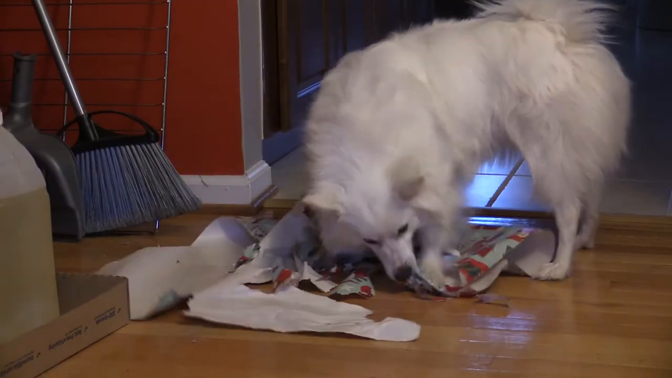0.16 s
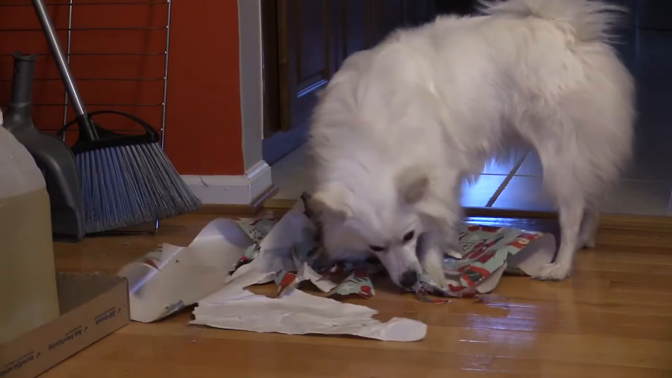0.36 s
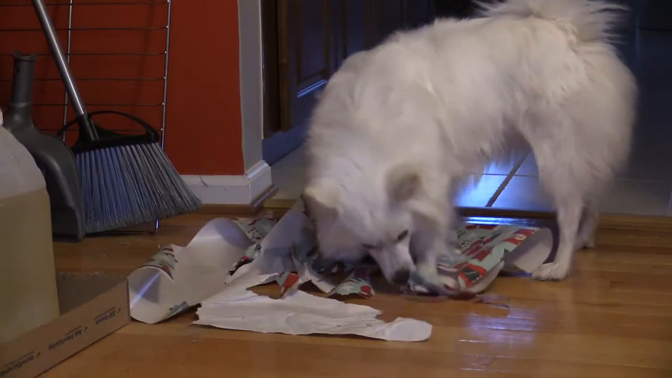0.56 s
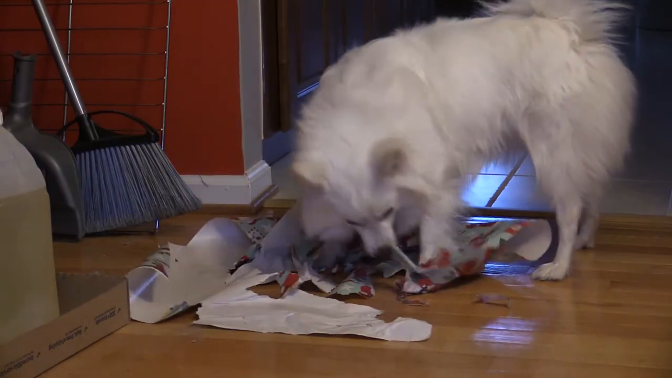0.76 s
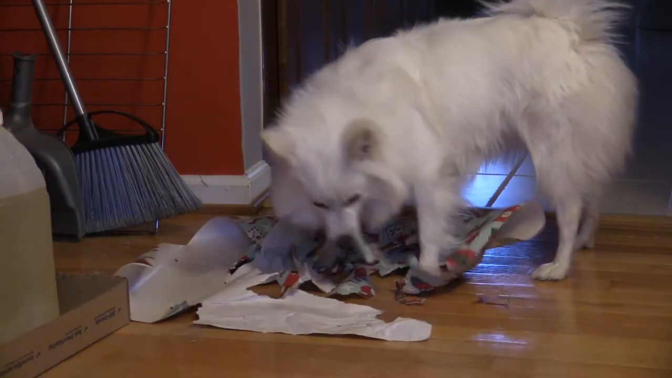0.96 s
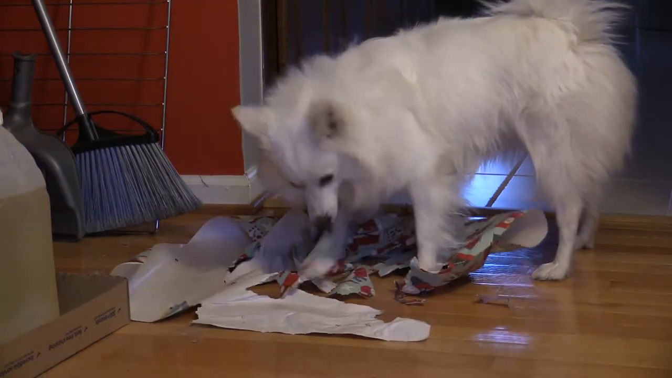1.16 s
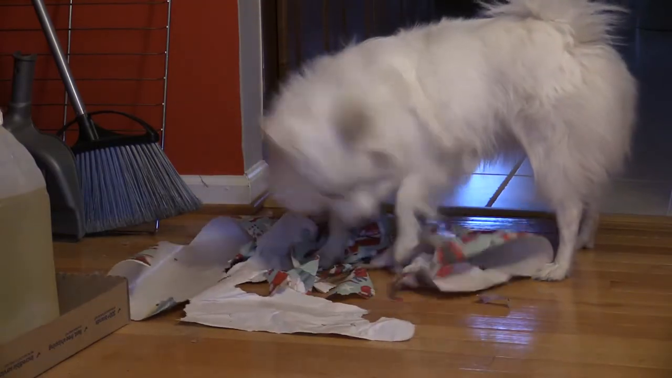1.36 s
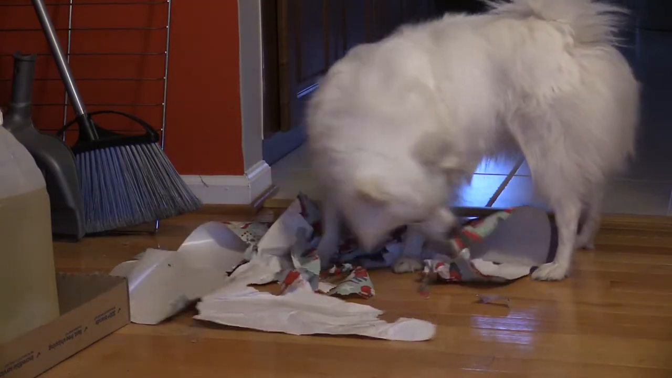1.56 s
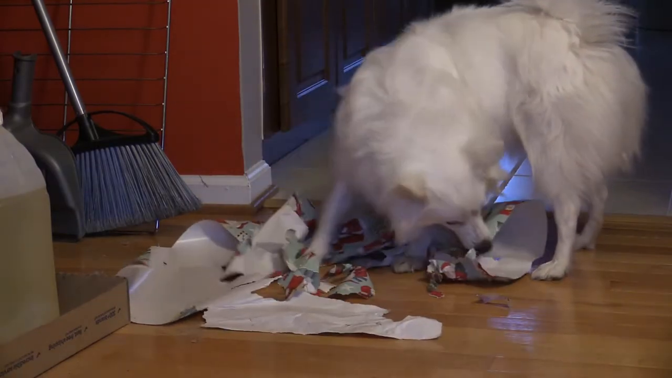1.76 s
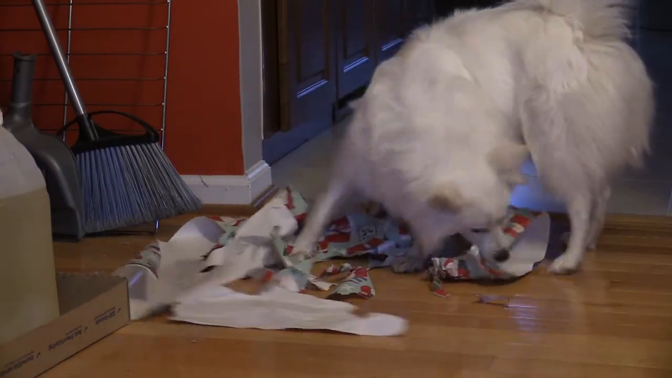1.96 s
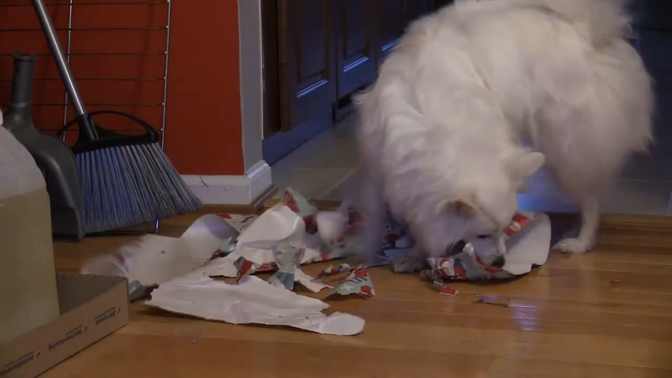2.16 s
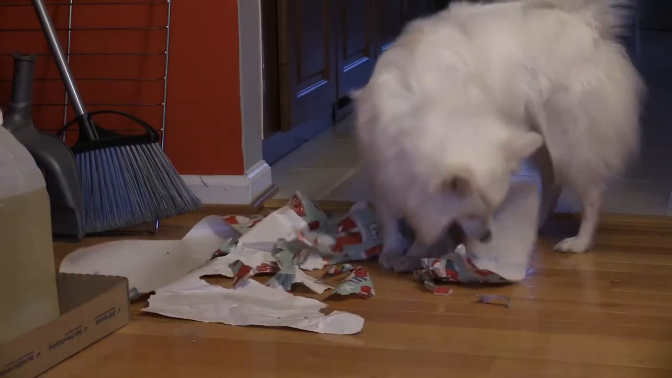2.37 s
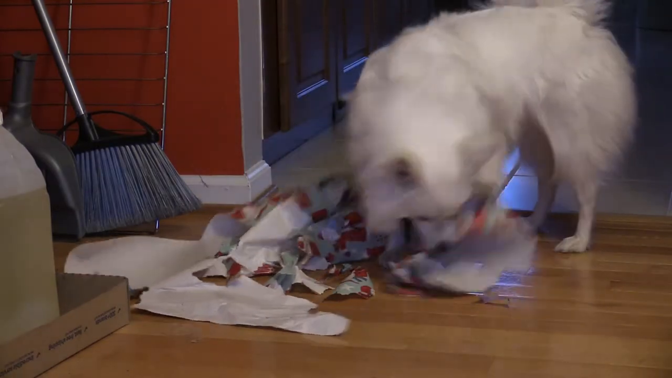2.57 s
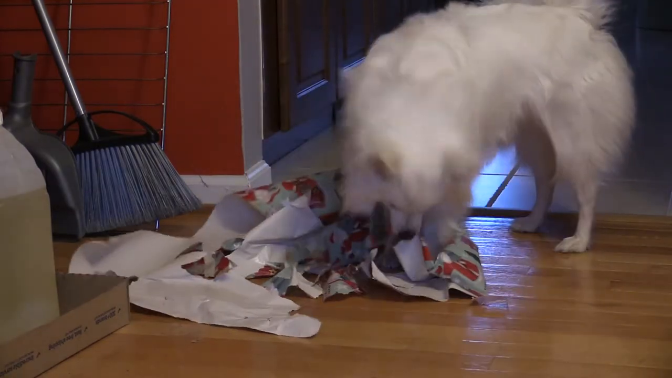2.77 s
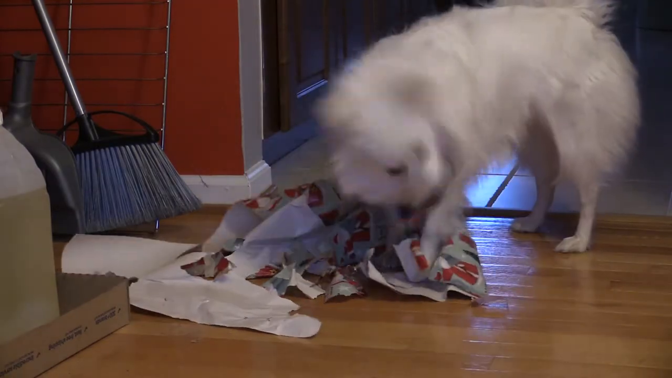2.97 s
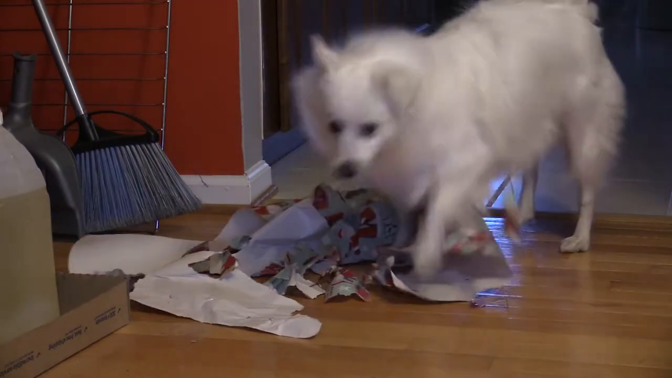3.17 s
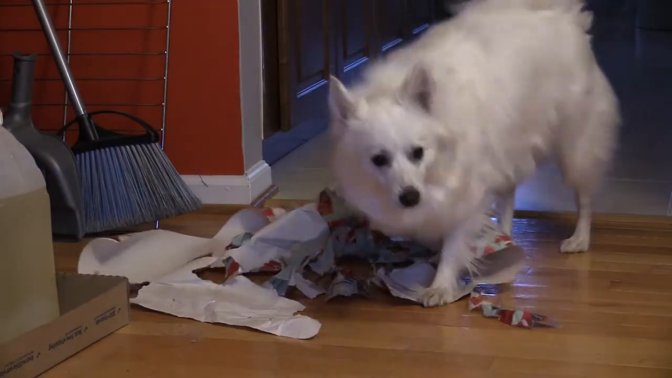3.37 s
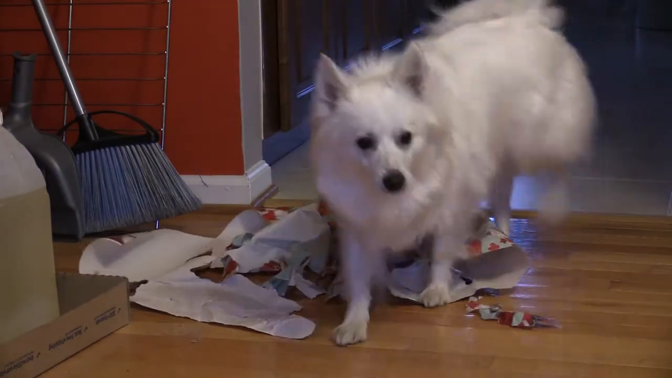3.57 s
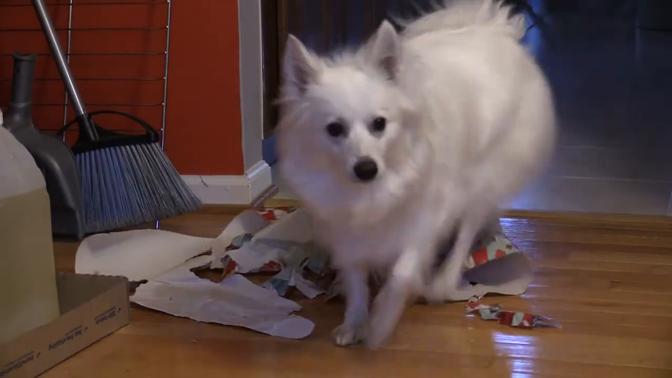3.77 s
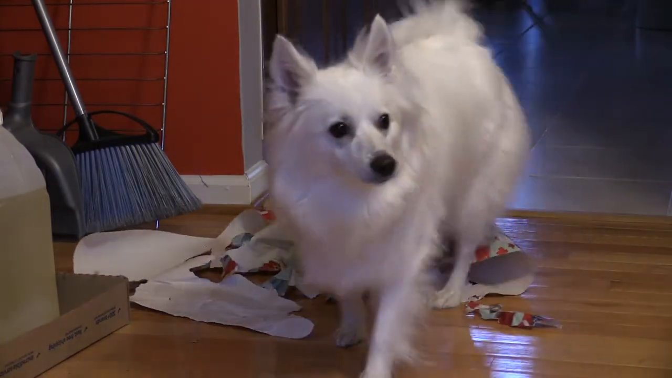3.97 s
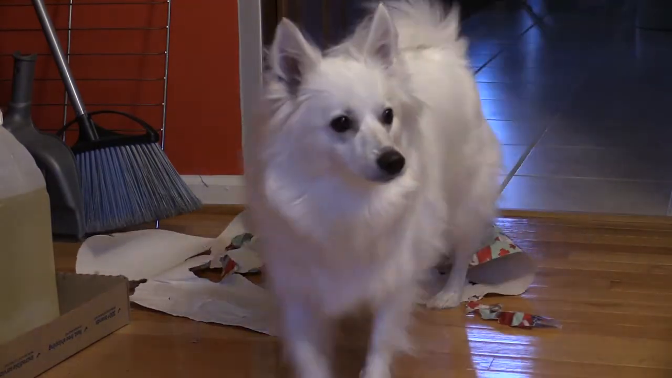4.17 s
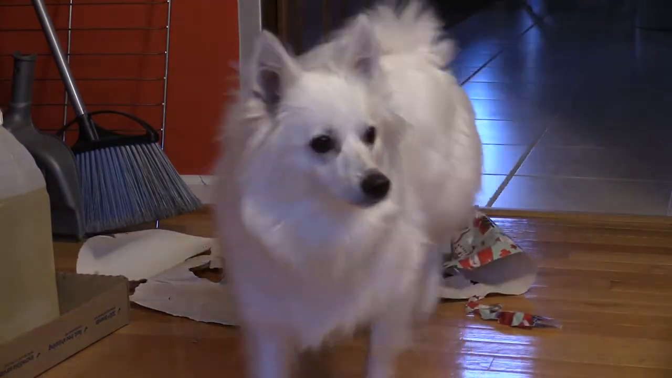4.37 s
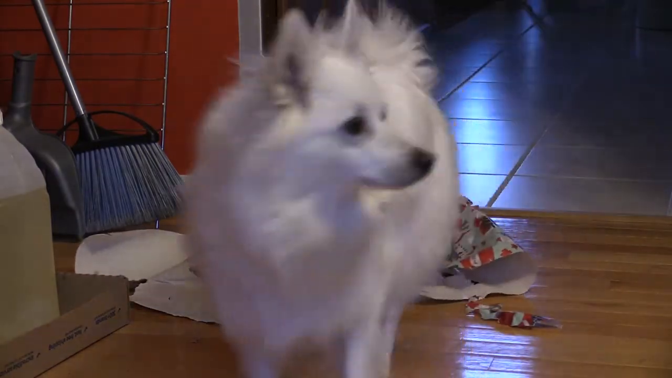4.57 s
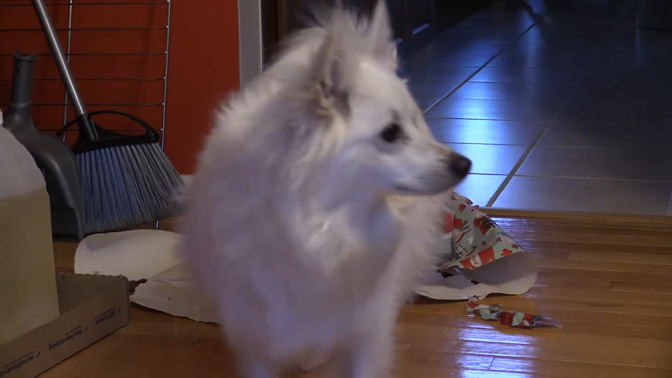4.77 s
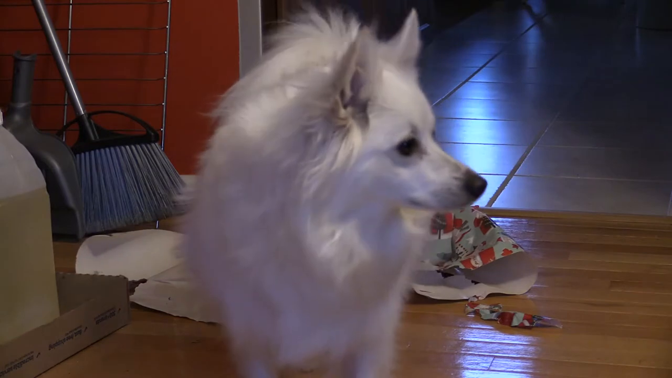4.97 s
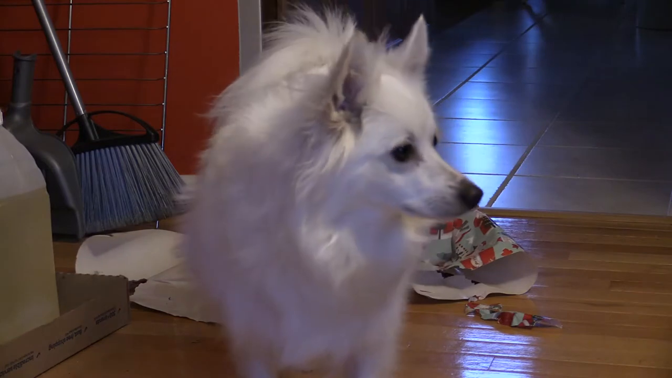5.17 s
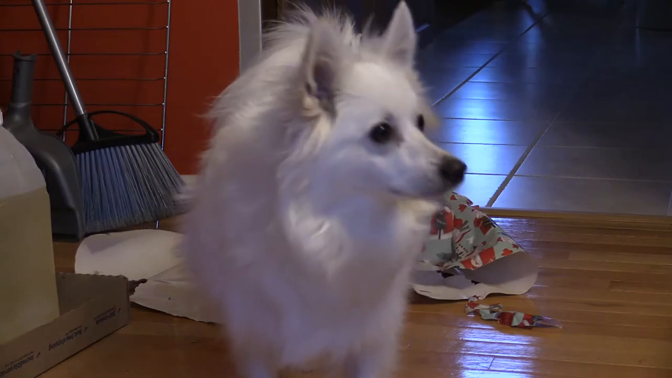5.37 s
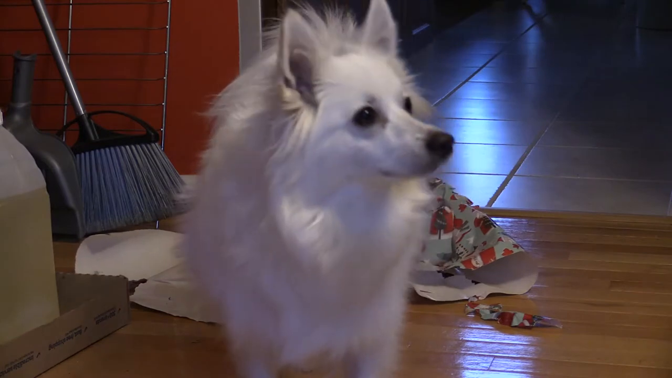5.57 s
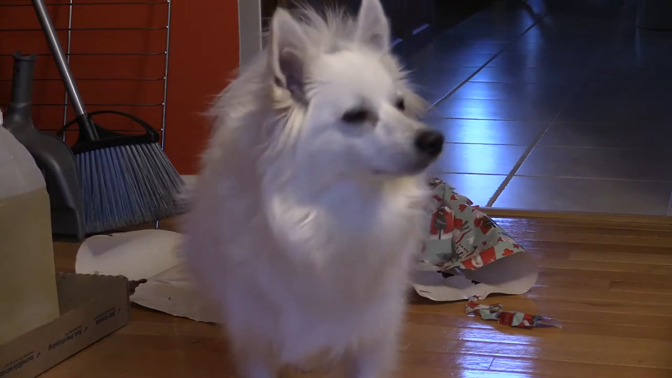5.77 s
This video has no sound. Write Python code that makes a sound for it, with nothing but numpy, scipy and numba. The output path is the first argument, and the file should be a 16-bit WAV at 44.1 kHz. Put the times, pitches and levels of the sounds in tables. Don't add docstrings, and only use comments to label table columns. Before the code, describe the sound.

A dog paws and tugs crumpled wrapping paper on a wooden floor, crackling in sharp uneven bursts, then steps away with light paw and claw taps.

```python
import sys
import numpy as np
from scipy import signal
from scipy.io import wavfile
from scipy.ndimage import uniform_filter1d
from numba import njit

SR = 44100
rng = np.random.default_rng(int(sys.argv[2]) if len(sys.argv) > 2 else 0)


def pcm_store(signal):
    levels = np.round(np.clip(np.atleast_2d(signal), -1, 1) * 32767)
    wavfile.write(sys.argv[1], SR, levels.astype(np.int16).T)


def rack_gain(trim_db):
    fader = np.asarray(trim_db, float)
    return 10 ** (fader / 20)


N = 256660


def along(table, hz, column=1):
    table = np.array(table, float)
    return np.interp(np.log(hz), np.log(table[:, 0]), table[:, column])


def band(x, hz):
    edges_hz = [hz / 2 ** 0.25, hz * 2 ** 0.25]
    return signal.sosfilt(signal.butter(2, edges_hz, "band", fs=SR, output="sos"), x)


def walk(rate_hz):
    hold = int(SR / rate_hz)
    steps = np.repeat(rng.standard_normal(N // hold + 1), hold)
    return uniform_filter1d(uniform_filter1d(steps, hold), hold)[:N]


def hum():
    # (frequency [Hz], density [dB per Hz])
    hum_spectrum = [(15, -34), (25, -24), (64, -20), (92, -6), (123, -10.5), (200, -4), (301, -2),
                    (427, -10.5), (607, 1.5), (840, -31.5), (1040, 6.5), (1400, -15), (16000, -30)]
    # (frequency [Hz], likeness [0-1])
    coherence = [(60, .5), (300, 0.58), (1000, 0), (4000, 0.64), (15000, 0.63)]
    out, swell = 0, walk(0.73)
    for hz in 30 * 2 ** np.arange(0, 9.1, 0.5):
        alike = np.clip(along(coherence, hz), -0.9, 0.99)
        mid, side = band(rng.standard_normal((2, N)), hz)
        db = along(hum_spectrum, hz) + 0.5 * swell + 2.2 * walk(9)
        stereo = np.sqrt(1 + alike) * mid + np.sqrt(1 - alike) * side * np.array([[1], [-1]])
        out = out + rack_gain(db) * stereo
    hum_db = -62
    return out * rack_gain(hum_db) / np.std(out.mean(axis=0))


@njit
def clicks(start, hz, turns, left, right):
    out = np.zeros((2, N))
    for k in range(len(start)):
        fade = hz[k] / turns[k] / SR
        rotation = np.exp(2j * np.pi * hz[k] / SR - fade)
        phasor = 1. + 0j
        for i in range(min(int(9 / fade), N - start[k])):
            swing = np.e * i * fade * phasor.imag
            out[0, start[k] + i] += left[k] * swing
            out[1, start[k] + i] += right[k] * swing
            phasor *= rotation
    return out


def play(s, hz, turns, db, pan_db, sign=0.86):
    start = np.clip(s * SR, 0, N - 1).astype(np.int64)
    left = sign * rack_gain(db + pan_db / 2)
    right = sign * rack_gain(db - pan_db / 2)
    return clicks(start, hz, turns + 0 * hz, left, right)


def pitch(share):
    return 130 * 115 ** np.sqrt(share)


def strength(chance, spread_db):
    return spread_db * np.minimum(-np.log(1 - chance), 3.3)


def strain(s):
    # (start [s], hold [s], level [dB], fine creases [dB])
    tugs = [(0.0, .04, -48.5, -2), (0.151, 0.046, -41.5, -1.5), (0.358, 0.064, -46.5, -0.5),
            (.456, 0.02, -41.5, 3.5), (0.534, 0.033, -43, -1), (0.588, 0.063, -34.5, 2),
            (0.672, 0.12, -32.5, 2.5), (0.816, 0.11, -35, 1), (1.204, 0.23, -55, -1),
            (1.408, 0.064, -40.5, -4.5), (1.495, .12, -55, 0.5), (1.716, 0.15, -54.5, -3),
            (1.872, .17, -44, -3.5), (2.067, 0.1, -47, 0.5), (2.198, 0.023, -38, 1.5),
            (2.306, 0.048, -42, -3), (2.372, 0.048, -39, -0.5), (2.461, 0.016, -36, 0.5),
            (2.525, .065, -33, -2.5), (2.619, 0.021, -25.5, -1.9), (2.651, 0.06, -24.5, -.8),
            (2.736, 0.06, -28.5, 4), (2.828, 0.02, -31, 1), (3.016, 0.15, -42.5, -8),
            (3.214, 0.028, -42, -3), (3.274, 0.095, -48, -3.5), (3.48, 0.28, -66, 1),
            (3.787, 0.038, -46, -4.5), (4.379, 0.019, -45.5, -6.5), (4.655, 0.03, -41, 1)]
    # (time [s], level [dB])
    resting = [
        (0.0, -53),
        (1.12, -60.5),
        (1.62, -57.5),
        (2.98, -48),
        (3.45, -59),
        (3.95, -62),
        (4.55, -71.5),
        (5.82, -82),
    ]
    # (time [s], resonance [Hz], big folds [dB])
    worked_pocket = [(0.0, 2500, 1), (.3, 2950, -12), (.62, 3020, -5), (1.0, 1870, 2), (1.25, 2100, -11),
                     (1.45, 2100, 0), (1.9, 1900, -7), (2.4, 2300, -2), (2.67, 2100, 0), (2.82, 2380, -5.5),
                     (3.2, 2200, -2.5), (5.82, 2060, -1)]
    rise_db_per_s, fall_db_per_s, resting_fine_db = 1300, 236, -4

    start, hold, level_db, fine_db = np.transpose(tugs)[..., None]
    db = level_db - rise_db_per_s * np.maximum(start - s, 0)
    db = db - fall_db_per_s * np.maximum(s - start - hold, 0)
    power = rack_gain(2 * np.maximum(db, -200))
    settle = rack_gain(2 * np.interp(s, *np.transpose(resting)))
    total = power.sum(axis=0) + settle
    fine = ((power * fine_db).sum(axis=0) + settle * resting_fine_db) / total
    times, pocket_hz, folds_db = np.transpose(worked_pocket)
    return 10 * np.log10(total), np.interp(s, times, folds_db), fine, np.interp(s, times, pocket_hz)


def rustle():
    # (frequency [Hz], density [dB per Hz])
    paper_spectrum = [(100, -23), (250, -5), (600, -4), (1500, 0.5), (3500, -0.5), (7000, -7.5),
                      (11000, -10.5), (15500, -12.5)]
    clicks_per_s = 9000
    when, size, strong, ring, side, swing = rng.random((int(clicks_per_s * N / SR), 6)).T
    s, hz = when * N / SR, pitch(size)
    level_db, fold_db, fine_db, pocket_hz = strain(s)
    big = np.clip(np.log2(1300 / hz), 0, 1)
    small = np.clip(np.log2(hz / 3300), 0, 1.2)
    db = level_db + along(paper_spectrum, hz) + 4.36 * np.log2(hz / 2000) - 6.0
    db += big * (fold_db + 4.0) + small * (fine_db + 2.5)
    db += 1.8 * np.exp(-(np.log2(hz / pocket_hz) / 0.43) ** 2)
    db += strength(strong, spread_db=3.0)
    db += 2.6 * np.tanh(walk(70))[(s * SR).astype(int)]
    return play(s, hz, 0.31 + 0.53 * ring, db, 1.5 + 15.6 * (side - 0.5), np.sign(swing - 0.5))


def thuds():
    # (time [s], peak [dB], pitch [Hz])
    landings = [(.03, -55, 61.5), (0.469, -46.5, 99), (.53, -60, 56), (0.933, -42.5, 151), (.96, -50, 81),
                (1.01, -65, 60), (1.106, -55.5, 86), (1.134, -47, 290), (1.402, -45, 153.6),
                (1.912, -47.5, 72.4), (1.96, -64, 50), (2.07, -68, 50), (2.17, -51, 131), (2.448, -44, 176),
                (2.618, -38, 224), (2.661, -42, 142), (3.221, -35.5, 266), (3.234, -49, 92.5),
                (3.29, -61, 68), (3.512, -49, 221), (3.623, -48, 312), (4.16, -53, 142), (4.318, -50, 300),
                (4.65, -32, 271), (4.659, -50, 89.5), (4.702, -32.5, 292), (4.93, -58, 75),
                (4.98, -50, 152), (5.409, -54, 128), (5.721, -58, 296)]
    s, peak_db, hz = np.transpose(landings)
    return play(s, hz, 0.97, peak_db - 3.5, 2.9)


def cracks():
    # (time [s], peak [dB], pitch [Hz])
    flips = [(0.153, -22, 1380), (0.164, -22, 4690), (0.368, -24, 3070), (0.537, -24, 3070),
             (0.583, -15, 3180), (0.627, -15, 2070), (0.683, -12, 3710), (0.686, -12, 3810),
             (0.712, -16, 2730), (0.721, -17, 4640), (1.717, -31, 3460), (2.137, -20, 1710),
             (2.147, -28, 1870), (2.274, -26, 4120), (2.378, -22, 2030), (2.469, -21, 2490),
             (2.691, -11, 2400), (2.857, -14, 1700), (3.218, -25, 3150), (3.794, -26, 2200),
             (4.03, -36, 4260), (4.477, -38, 2590), (4.666, -15, 1350), (5.006, -27, 2670),
             (5.478, -45, 2230)]
    s, peak_db, hz = np.transpose(flips)
    return play(s, hz, 0.33, peak_db - 4.5, 1.1)


def rubs():
    # (start [s], end [s], first pitch [Hz], last pitch [Hz], level [dB])
    strokes = [(0.153, .17, 1420, 1470, -43.5), (0.365, 0.394, 3020, 3100, -35.5),
               (0.447, 0.471, 3040, 3100, -46), (0.533, 0.561, 3240, 3100, -32),
               (0.608, 0.638, 2080, 2090, -33), (0.665, 0.718, 3500, 3440, -25.5),
               (0.588, 0.662, 470, 496, -40), (1.3, 1.398, 1830, 2060, -45.5),
               (2.079, 2.202, 1500, 1860, -37.5), (2.615, 2.664, 1410, 1500, -32),
               (2.847, 2.904, 1660, 1660, -33.5), (1.751, 1.862, 1720, 1800, -46.5),
               (5.169, 5.192, 2960, 2900, -59), (3.791, 3.823, 2240, 2200, -54),
               (4.649, 4.681, 1300, 1135, -29.5), (4.982, 5.005, 955, 940, -54),
               (4.984, 5.007, 580, 564, -49.5)]
    slips = 24
    start, end, first_hz, last_hz, level_db = np.transpose(strokes)[..., None]
    step, detune, strong = rng.random((len(strokes), 3, slips)).transpose(1, 0, 2)
    done = (np.arange(slips) + step) / slips
    s = start + done * (end - start)
    hz = (first_hz + done * (last_hz - first_hz)) * (1 + 0.14 * (detune - 0.5))
    db = level_db - 3.5 + strength(strong, spread_db=0.5)
    return play(s.ravel(), hz.ravel(), 2.4, db.ravel(), 1.4)


def volleys(s, peak_db, centre_hz, fold_db, fine_db, length_ms, pan_db, first):
    creases = 110
    size, late, strong, ring, swing = rng.random((len(s), 5, creases)).transpose(1, 0, 2)
    hz = pitch((np.arange(creases) + size) / creases)
    wait = np.maximum(-np.log(1 - late) - first, 0) * length_ms / 1000
    octaves = np.log2(hz / centre_hz)
    below = np.clip(octaves / np.log2(520 / centre_hz), 0, 1.6) * (fold_db + 7.5)
    above = np.maximum(np.log2(hz / 3500) / np.log2(8500 / 3500), 0) * np.minimum(fine_db + 10, -3)
    above -= 0.26 * np.maximum(octaves, 0)
    above -= 8 * np.maximum(np.log2(hz / 9000), 0)
    pocket = 3.0 * np.exp(-(octaves / 0.093) ** 2)
    db = peak_db - 19 + below + above + pocket + strength(strong, spread_db=2.0)
    turns = 0.46 + 0.54 * ring
    return play((s + wait).ravel(), hz.ravel(), turns.ravel(), db.ravel(), pan_db, np.sign(swing - 0.5).ravel())


def snaps():
    # (time [s], peak [dB], centre [Hz], fine creases [dB])
    folds = [(0.1533, -15, 3130, -8), (0.329, -28.5, 4870, -6), (0.3679, -17, 3020, -7),
             (0.4577, -14.5, 3300, -4), (0.536, -21, 3070, -3), (0.5807, -12, 3300, -4),
             (0.6296, -16.5, 2080, -8), (0.66, -11.5, 3260, -7), (0.6838, -8.5, 3880, -19),
             (0.921, -15.5, 1380, -37), (1.2799, -30, 1930, -9), (1.3479, -25, 1950, -31),
             (1.4173, -41, 2130, -6), (1.4508, -23.5, 2500, -26), (1.7163, -23, 3400, -48),
             (1.8688, -28.5, 1500, -6), (1.9046, -28, 2020, -6), (2.0903, -22, 1600, -6),
             (2.137, -20.5, 1950, -22), (2.2078, -19.5, 2060, -11), (2.2737, -20.5, 4140, -12),
             (2.318, -15.5, 2940, -8), (2.464, -20, 3540, -13), (2.527, -13.5, 2000, -6),
             (2.61, -11.5, 1600, -6), (2.6604, -20, 2820, -33), (2.8542, -21, 1690, -6),
             (3.0298, -20, 1960, -28), (3.1397, -27, 2490, -41), (3.217, -17, 3200, -6)]
    s, peak_db, hz, fine_db = np.transpose(folds)[..., None]
    return volleys(s, peak_db, hz, -29, fine_db, length_ms=9, pan_db=2.0, first=0.05)


def footsteps():
    # (time [s], peak [dB], centre [Hz], big folds [dB], fine creases [dB])
    treads = [(3.5209, -38.5, 1740, -32, -6), (3.689, -36, 2450, -17, -6), (3.7844, -43, 2000, -18, -22),
              (3.794, -22.5, 2400, -31, -12), (4.0301, -28.5, 4200, -28, -10),
              (4.044, -28.5, 4500, -30, -10), (4.2552, -42.5, 3330, -29, -12),
              (4.371, -30.5, 1930, -31, -17), (4.378, -26, 1190, -33, -12), (4.476, -35, 2590, -33, -13),
              (4.627, -36.5, 1320, -15, -31), (4.6513, -19.5, 1390, -14.5, -9),
              (4.662, -12, 1290, -23, -10), (4.9836, -33, 1210, -20, -10), (4.99, -27, 1550, -17, -10),
              (5.0036, -22.5, 2100, -18.5, -10), (5.1566, -31.5, 2210, -18, -25),
              (5.1724, -27.5, 2100, -47, -29), (5.24, -37.5, 2680, -22, -28),
              (5.4777, -36.5, 2350, -35, -12)]
    return volleys(*np.transpose(treads)[..., None], length_ms=8, pan_db=1.5, first=0.03)


def tail():
    # (frequency [Hz], reverberation time T60 [s], level [dB])
    decay = [(100, 0.39, 1.5), (390, 0.23, -0.5), (1500, 0.33, -3.5), (5330, 0.22, 1), (11800, 0.13, 0)]
    t = np.arange(SR // 2) / SR
    shared, own = rng.standard_normal(len(t)), rng.standard_normal((2, len(t)))
    out = 0
    for hz in 50 * 2 ** np.arange(0, 8.6, 0.5):
        noise = shared + own * np.clip(hz / 900, 0.35, 0.85)
        db = along(decay, hz, column=2) - 60 * t / along(decay, hz)
        out = out + rack_gain(db) * band(noise, hz)
    return out * (1 - np.exp(-np.maximum(t - 0.001, 0) / 0.00053))


def room(x):
    places = 5
    spot = (np.arange(N) / SR * 45) % places
    wet = 0
    for k in range(places):
        apart = np.abs((spot - k + places / 2) % places - places / 2)
        share = np.cos(np.pi / 2 * np.minimum(apart, 1))
        wet = wet + signal.fftconvolve(x * share, tail(), axes=1)[:, :N]
    return x + rack_gain(-24.5) * wet


def scene():
    paper = rustle() + rubs() + cracks() + snaps() + footsteps()
    paper = signal.sosfilt(signal.butter(3, 125., "high", fs=SR, output="sos"), paper)
    return room(paper + thuds()) + hum()


def low_pass(x):
    return signal.sosfilt(signal.butter(12, 15830, fs=SR, output="sos"), x)


def record(dry):
    dry = signal.sosfilt(signal.butter(2, 25., "high", fs=SR, output="sos"), dry)
    dry = signal.sosfilt(signal.butter(2, 11000., fs=SR, output="sos"), dry)
    ceiling = 0.42
    return low_pass(ceiling * np.tanh(dry / ceiling))


dry = scene()
out = record(dry)
pcm_store(out)
```